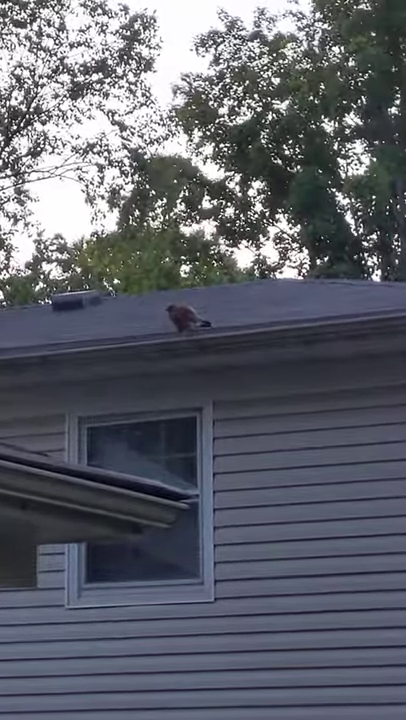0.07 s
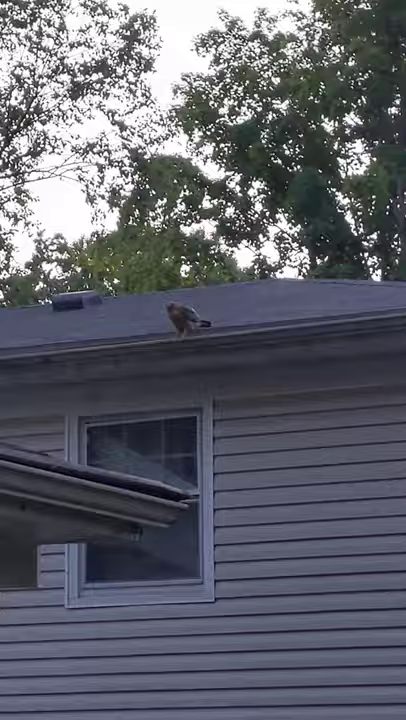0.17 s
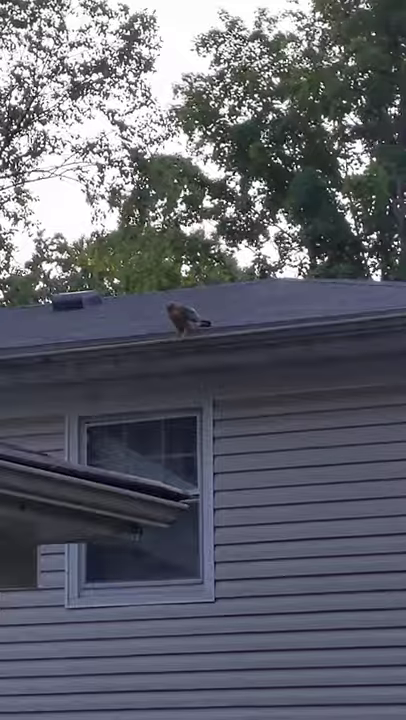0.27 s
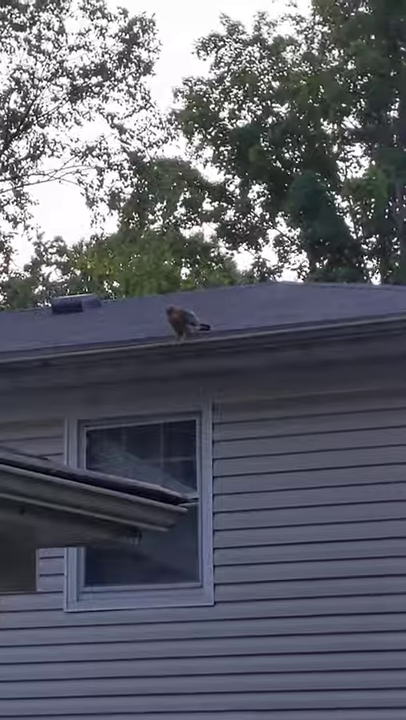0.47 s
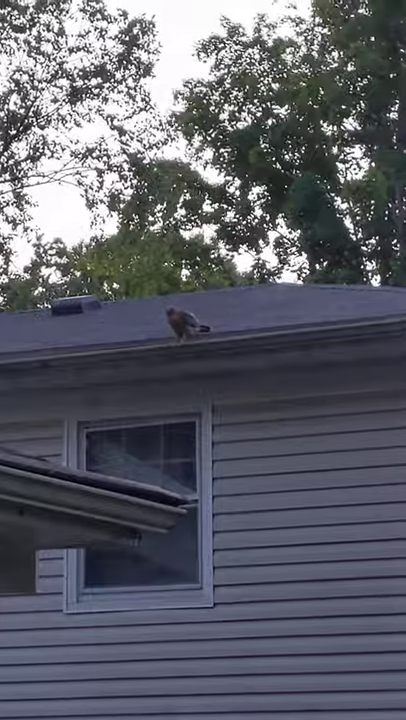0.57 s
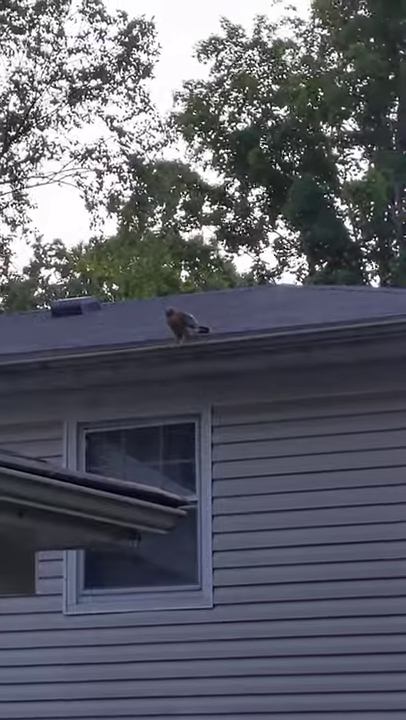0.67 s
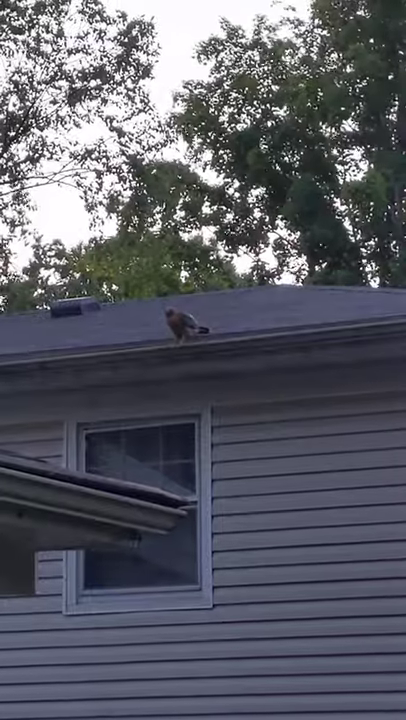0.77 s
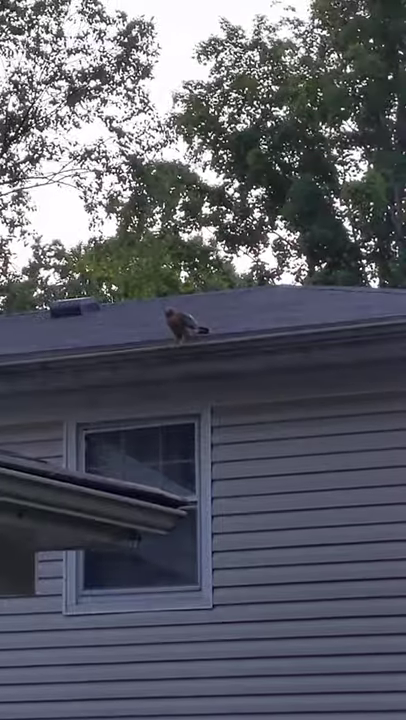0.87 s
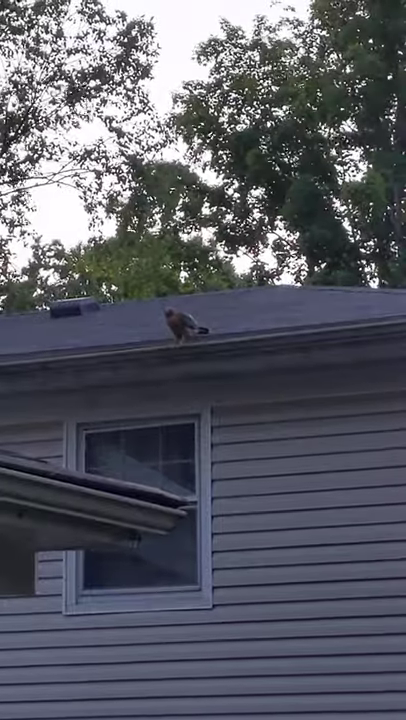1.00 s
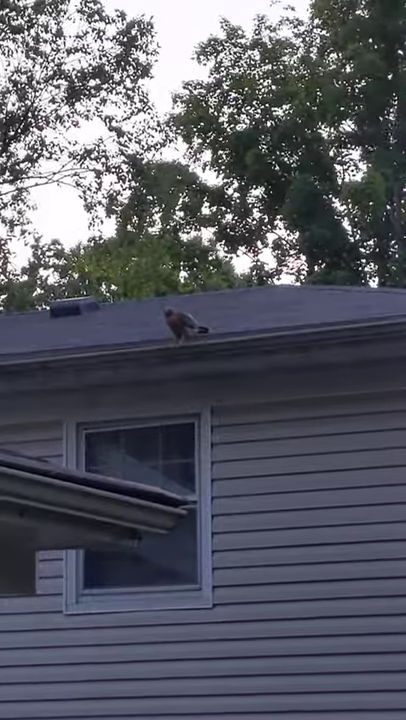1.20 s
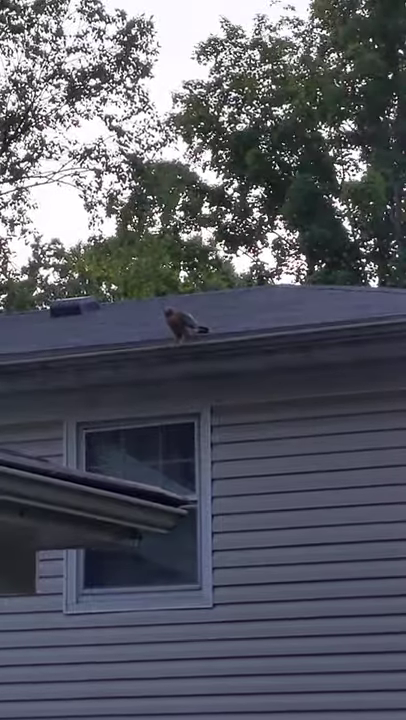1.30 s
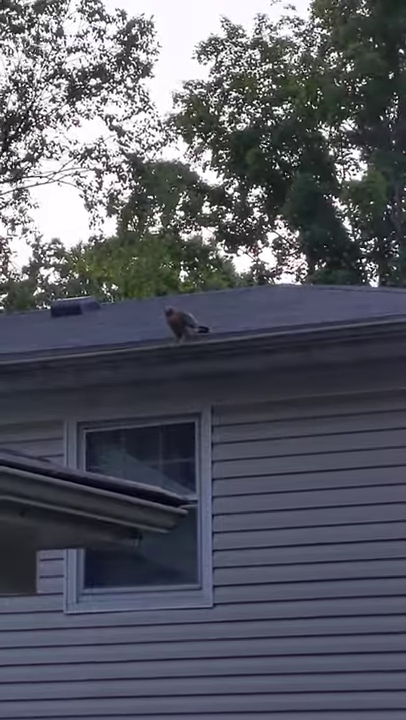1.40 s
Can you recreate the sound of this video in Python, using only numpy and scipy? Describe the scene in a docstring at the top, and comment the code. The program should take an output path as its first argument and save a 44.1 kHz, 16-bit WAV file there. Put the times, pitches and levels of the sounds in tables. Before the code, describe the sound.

Small birds chirp in quick, sharp bursts over a soft outdoor hush.

```python
"""Small birds in a quiet yard

Birds chirp in quick bursts between houses and trees. The two sides of the syrinx sing at once,
a low arch and a high sweep, which mix into faint overtones; hoarse notes fall in between.
The echo of an earlier chirp rings faintly at the start, and distant birds call now and then.
Walls and foliage reflect the calls, over a soft outdoor hush and a distant machine hum."""
import sys
import numpy as np
from scipy import signal
from scipy.fft import rfft, irfft
from scipy.io import wavfile

SR = 44100
rng = np.random.default_rng(int(sys.argv[2]) if len(sys.argv) > 2 else 0)


def generate_wav(signal):
    """Clip the signal to [-1, 1] and save it as 16-bit WAV at the path in sys.argv[1]."""
    frames = np.transpose(np.atleast_2d(signal))
    scaled = np.clip(frames, -1, 1) * 32767
    pcm = np.round(scaled).astype(np.int16)
    wavfile.write(sys.argv[1], SR, pcm)


N = 63945
TIME = np.arange(N) / SR
BIN_HZ = np.arange(N // 2 + 1) * SR / N


def from_db(db):
    """Amplitude ratio: tenfold for every 20 dB."""
    return 10 ** (np.asarray(db) / 20)


def rms_one(x):
    """Normalisation to unit mean power."""
    return x / np.sqrt(np.mean(x ** 2) + 1e-20)


def at_hz(points, hz):
    """Interpolation of a table on a logarithmic frequency axis."""
    known_hz, values = np.transpose(points)
    return np.interp(np.log(np.maximum(hz, 1)), np.log(known_hz), values)


def pan(lean_db):
    """Constant-power panning: two gains from a level difference, left minus right."""
    gains = from_db(np.array([[.5], [-.5]]) * lean_db)
    return gains / np.sqrt(np.mean(gains ** 2, axis=0))


def drift(corner_hz):
    """Low-pass filtered noise: a smooth random wander with a spread of about 1."""
    pole = np.exp(-2 * np.pi * corner_hz / SR)
    wander = signal.lfilter([1], [1, -2 * pole, pole * pole], rng.standard_normal(N + SR))
    return rms_one(wander)[SR:]


def coloured(x, points):
    """Zero-phase filtering by a table of gain against frequency."""
    size = x.shape[-1]
    hz = np.arange(size // 2 + 1) * SR / size
    return irfft(rfft(x) * from_db(at_hz(points, hz)), size)


def phase_of(hz):
    """Phase as the time integral of frequency."""
    return 2 * np.pi * np.cumsum(hz) / SR


def gate(t, length_s, edge_s):
    """Amplitude envelope with raised-cosine attack and release."""
    return np.sin(np.pi / 2 * np.clip(np.minimum(t, length_s - t) / edge_s, 0, 1)) ** 2


def hush():
    """Diffuse noise of air and far traffic: coherence between the ears is lost towards the treble."""
    # shape of the noise spectrum: (frequency [Hz], relative density [dB])
    spectrum = [(12, -44), (20, 3.5), (185, -9), (315, -14.5), (352, -12), (427, -15), (465, -12.5),
                (549, -12.5), (1540, -14.5), (1870, -15.5), (3960, -19), (4310, -24.5), (15500, -34)]
    # likeness of the two sides: (frequency [Hz], coherence [0-1])
    coherence = [(30, 0.79), (120, 0.94), (250, 0.88), (500, 0.7), (1000, 0.28), (3000, 0.034), (12000, .0)]
    # balance of the noise: (frequency [Hz], left minus right [dB])
    balance = [(30, 3), (100, 3), (500, 4), (1000, 0), (4000, 1.5), (12000, -1)]
    mid, side = rfft(rng.standard_normal((2, N))) * from_db(at_hz(spectrum, BIN_HZ))
    alike = at_hz(coherence, BIN_HZ)
    ears = np.sqrt(1 + alike) * mid + np.sqrt(1 - alike) * side * [[1], [-1]]
    noise = irfft(ears * pan(at_hz(balance, BIN_HZ)), N)
    level_db = -54 + 1.5 * drift(2.57)
    return from_db(level_db) * rms_one(noise)


def machine_hum():
    """Line spectrum of a distant machine, each partial slowly modulated in level and frequency."""
    # tones of the machine: (frequency [Hz], level [dB])
    partials = [(74, -68), (120, -70), (184, -72.5), (240, -70), (650, -75)]
    waver_db, waver_hz = 3, 2
    tones = sum(from_db(db + waver_db * drift(2.6)) * np.sin(phase_of(hz + waver_hz * drift(4.1)))
                for hz, db in partials)
    return pan(lean_db=3) * np.sqrt(2) * tones


def faint_tone(start_s, length_s, start_hz, end_hz, level_db):
    """Linear frequency glide of a wavering tone: an earlier chirp's fading echo, or a distant call."""
    t = TIME - start_s
    hz = np.interp(t, [0, length_s], [start_hz, end_hz]) + 50 * drift(200)
    return from_db(level_db) * gate(t, length_s, length_s / 2) * np.sqrt(2) * np.sin(phase_of(hz))


def chirp(top_s, rise_s, fall_s, top_hz, end_hz, level_db, high_db, overtones_db, tilt_db,
          swell_s, swell_db, lean_db):
    """Nonlinear mixing: the two voices of the syrinx give rise to a sum tone and harmonics."""
    # envelopes of the voices: (place [-1 start, 0 top, 1 end], low voice [dB], high voice [dB])
    effort = [(-1.15, -48, -32), (-1.19, -28, -2), (-0.99, -16, -3), (-0.28, -0.5, -3.5), (0.091, 1, -1.5),
              (0.31, 0, -6.5), (0.97, -6, -23), (1.03, -13.5, -40), (1.2, -34, -55)]
    # colour of the overtones: (frequency [Hz], gain [dB])
    beak = [(4000, -2), (8500, -6), (9700, -6), (10700, 2.5), (11500, 5), (13000, -6.5)]
    t = TIME - top_s
    places, low_effort, high_effort = np.transpose(effort)
    place = np.clip(t / np.where(t < 0, rise_s, fall_s), places[0], places[-1])
    sounding = (place > places[0]) & (place < places[-1])
    lead_s, settle_s = .028, .011
    unsettled = np.exp(-np.maximum(t + lead_s, 0) / settle_s)   # both voices start hoarse

    # The low voice climbs to its top and falls away.
    depth_hz = np.where(t < 0, 2196, top_hz - end_hz)
    arch_hz = top_hz - depth_hz * np.abs(place) ** 2.15
    low_jitter_hz = (18 + 169.8 * unsettled ** 2) * drift(200)
    low_phase = phase_of(arch_hz + low_jitter_hz)

    # The high voice leaps up, settles and sags.
    ceiling_hz, leap_hz, sag_hz_per_s = 7254, 2750, 11400
    sweep_hz = ceiling_hz - leap_hz * unsettled - sag_hz_per_s * np.maximum(t, 0)
    high_jitter_hz = (50 + 332.6 * unsettled) * drift(500)
    high_phase = phase_of(sweep_hz + high_jitter_hz)

    flutter_db, swell_width_s = 2.04, 0.0064
    low_gain = from_db(np.interp(place, places, low_effort) + tilt_db * place + flutter_db * drift(200))
    high_gain = from_db(np.interp(place, places, high_effort) + flutter_db * drift(200))
    swell = from_db(swell_db * np.exp(-((TIME - swell_s) / swell_width_s) ** 2))
    voices = swell * low_gain * np.sin(low_phase) + from_db(high_db) * high_gain * np.sin(high_phase)

    mixed_gain = np.sqrt(low_gain * high_gain)
    sum_tone = mixed_gain * np.sin(low_phase + high_phase)
    harmonics = from_db(-10) * low_gain * np.sin(2 * low_phase)
    harmonics += from_db(-4.5) * mixed_gain * np.sin(3 * low_phase)
    harmonics += from_db(-4.5) * unsettled * high_gain * np.sin(2 * high_phase)
    overtones = from_db(overtones_db) * coloured(sounding * (sum_tone + harmonics), beak)
    return pan(lean_db) * from_db(level_db) * np.sqrt(2) * (sounding * voices + overtones)


def hoarse_note(start_s, length_s, start_hz, middle_hz, end_hz, level_db, hoarseness, lean_db):
    """Random frequency modulation roughens a bent whistle; hiss swells towards its middle."""
    # spectrum of the hiss: (frequency [Hz], relative level [dB])
    rasp = [(1800, -52), (2600, 5.5), (5000, -20), (7000, -7.5), (9000, -10.5), (12000, -4.5), (15500, -22)]
    t = TIME - start_s
    parabola = np.polyfit([0, .5, 1], [start_hz, middle_hz, end_hz], 2)
    bend_hz = np.polyval(parabola, np.clip(t / length_s, 0, 1))
    jitter_hz = hoarseness * 601.5 * drift(700)
    phase = phase_of(bend_hz + jitter_hz)
    tone = np.sin(phase) + from_db(-23.5) * np.sin(2 * phase)
    whistle = np.sqrt(2) * gate(t, length_s, edge_s=0.0046) * tone
    noise = rms_one(coloured(rng.standard_normal(N), rasp))
    hiss = hoarseness * from_db(2.5) * gate(t, length_s, length_s / 2) * noise
    return pan(lean_db) * from_db(level_db) * (whistle + hiss)


def yard_echoes(birds):
    """Reverberation by convolution: wall echoes, dense nearby scatter and a tail from the trees."""
    # reflections from a wall, the eaves and the next house: (delay [s], left [dB], right [dB])
    reflections = [(.0045, -22, -7.5), (0.0117, -22, -8.5), (0.021, -17.5, -11.5)]
    # colour of the scattered sound: (frequency [Hz], gain [dB])
    scatter_colour = [(1500, 3), (2800, 5), (3700, 3.5), (4200, -1), (5200, 1.5), (7000, 0.5), (11000, -1),
                      (16000, 2)]
    build_up = 1 - np.exp(-TIME / 0.0083)
    response = np.zeros((2, N))
    for level_db, t60_s in ((-3, 0.4), (-5.5, 0.89)):   # early scatter, then the tail
        fade = np.exp(-np.log(1000) * TIME / t60_s) * build_up
        response += from_db(level_db) * fade / np.sqrt(np.sum(fade ** 2)) * rng.standard_normal((2, N))
    response = coloured(response, scatter_colour)
    for delay_s, left_db, right_db in reflections:
        response[:, int(delay_s * SR)] += from_db([left_db, right_db])
    return signal.fftconvolve(birds.mean(axis=0)[None], response, axes=1)[:, :N]


def scene():
    """Superposition of direct calls, their reflections and the background."""
    # a faint opening ring near 4.2 kHz, the fading echo of an earlier chirp, then distant calls:
    # (start [s], length [s], start pitch [Hz], end pitch [Hz], level [dB])
    faint_tones = [(-.09, 0.2, 4170, 4173, -59.5), (0.06, .04, 4990, 5000, -62.5),
                   (0.179, 0.033, 4920, 4860, -52), (0.567, 0.065, 2347, 2307, -61.5),
                   (1.231, 0.035, 2880, 2257, -61.5), (1.285, 0.021, 2280, 2670, -71),
                   (1.281, 0.047, 1590, 1500, -63.5), (1.412, 0.045, 1820, 1960, -57),
                   (1.431, 0.038, 3150, 3020, -60)]
    # two-voiced chirps in close pairs: (time of top [s], rise [s], fall [s], top pitch [Hz],
    # end pitch [Hz], level [dB], high voice gain [dB], overtone gain [dB], low voice tilt [dB],
    # time of swell [s], swell [dB], left minus right [dB], echo send [dB])
    chirps = [ (.250, 0.035, 0.043, 4214, 1940, -41.5, -10, -10, -0.5, .243, 0, 4.5, 1.5),
              (.274, .032, .044, 4178, 2000, -48.5, -4.5, -7, 5.5, .272, 5.5, -2, -5),
              (.451, .031, 0.03, 4235, 1844, -42.5, -5.5, -12, 1, .441, 9, -3, -2.5),
              (.479, 0.032, 0.038, 4156, 1904, -47, -6.5, -12, 1.5, .483, 4, 16, -5.5),
              (.654, .033, .039, 4183, 2444, -42, -7, -12, 5, .656, 1.5, 17, -1.5),
              (.659, .033, .038, 4151, 2394, -39.5, -9, -14.5, 5, .666, 6, -6, -10.5),
              (.963, .031, 0.041, 4206, 1992, -43.5, -8, -18.5, -0.5, .963, 4.5, 4, 2),
              (1.025, .031, .035, 4180, 2120, -50, -4, -11.5, 7, 1.014, 16, -2.5, -5), ]
    # hoarse notes: (start [s], length [s], start pitch [Hz], middle pitch [Hz], end pitch [Hz],
    # level [dB], hoarseness [0-1], left minus right [dB])
    notes = [ (.502, .026, 4700, 4700, 4160, -44.5, 0.4, 8), (.526, 0.031, 2700, 2700, 2255, -49.5, .1, 15),
             (.512, .036, 4403, 4010, 3250, -47.5, .75, -2),
             (.614, 0.015, 4000, 5050, 5440, -47.5, 0.52, 12), (.622, .028, 4630, 5615, 6760, -40, .35, 34),
             (0.62, .046, 4595, 5805, 7000, -46, 0.8, -19), (.622, .040, 2200, 2950, 3150, -49, .3, 1),
             (.745, 0.027, 4560, 4970, 4360, -50.5, 0.4, 9), (.774, 0.0195, 2800, 3200, 2530, -47, .12, 27),
             ]
    # balance of the birds and their echoes: (frequency [Hz], left minus right [dB])
    bird_balance = [(2000, 0), (4300, 5.5), (7000, -1.5), (11000, -6.5), (15000, -13)]
    note_echo_db, left_lag_s = -3, 0.0003035   # the birds sit to the right
    calls = [(chirp(*row), echo_db) for *row, echo_db in chirps]
    calls += [(hoarse_note(*row), note_echo_db) for row in notes]
    calls += [(faint_tone(*row), 0) for row in faint_tones]
    left, right = sum(call for call, _ in calls)
    direct = np.array([rfft(left) * np.exp(-2j * np.pi * BIN_HZ * left_lag_s), rfft(right)])
    into_yard = sum(from_db(echo_db) * call for call, echo_db in calls)
    reflected = rfft(yard_echoes(into_yard))
    birds = irfft((direct + reflected) * pan(at_hz(bird_balance, BIN_HZ)), N)
    return birds + hush() + machine_hum()


def record(dry):
    """Band limiting: a steep elliptic low-pass removes the highest treble."""
    cutoff_hz = 15700
    return signal.sosfilt(signal.ellip(12, .1, 80, cutoff_hz, fs=SR, output="sos"), dry)


dry = scene()
out = record(dry)
generate_wav(out)
```